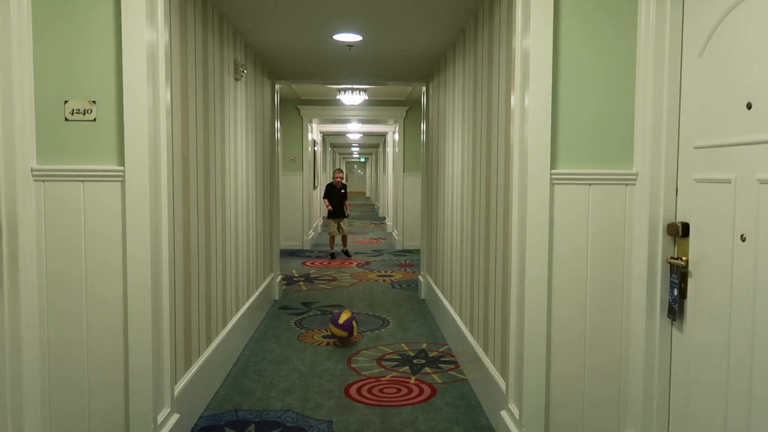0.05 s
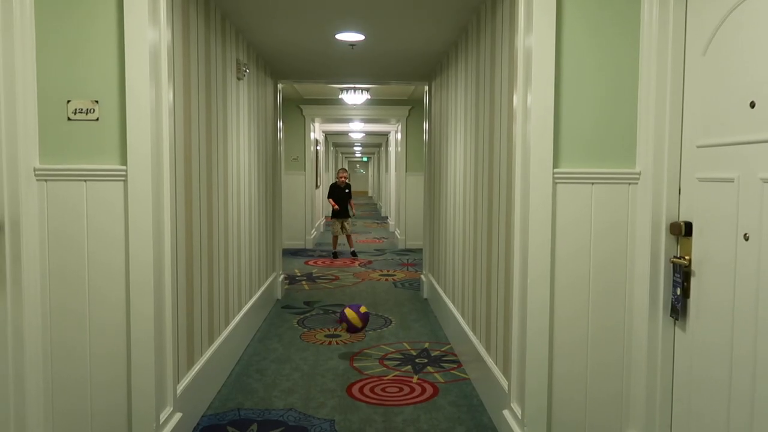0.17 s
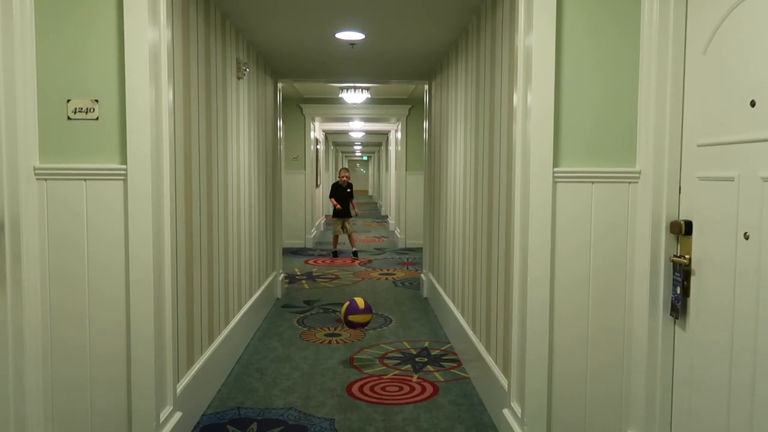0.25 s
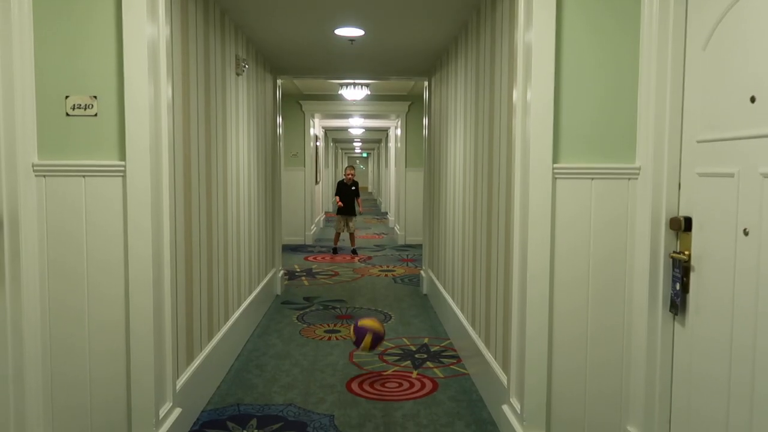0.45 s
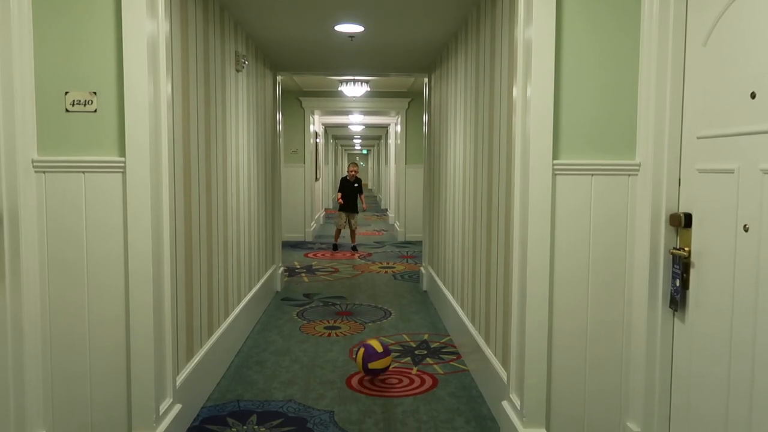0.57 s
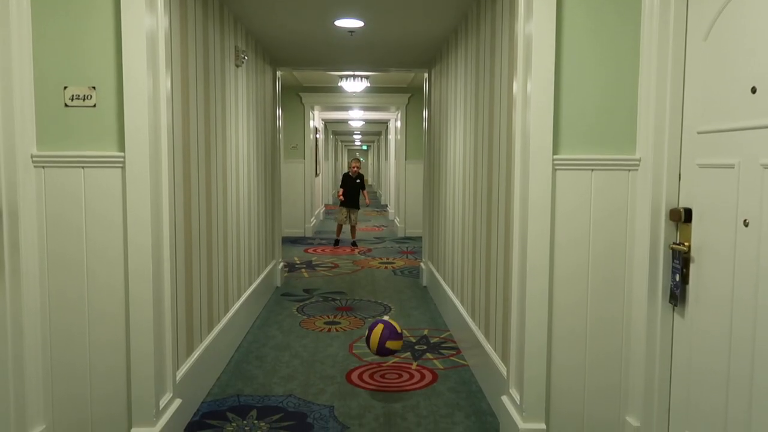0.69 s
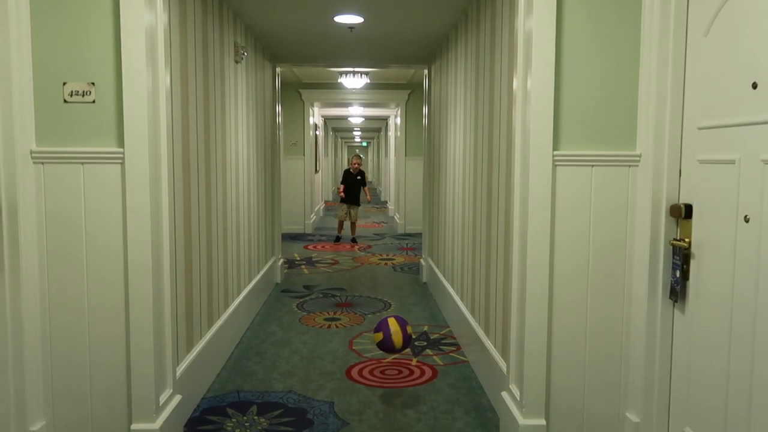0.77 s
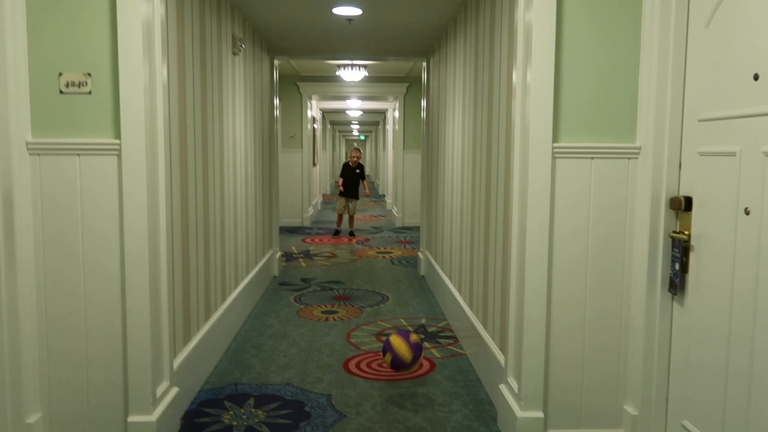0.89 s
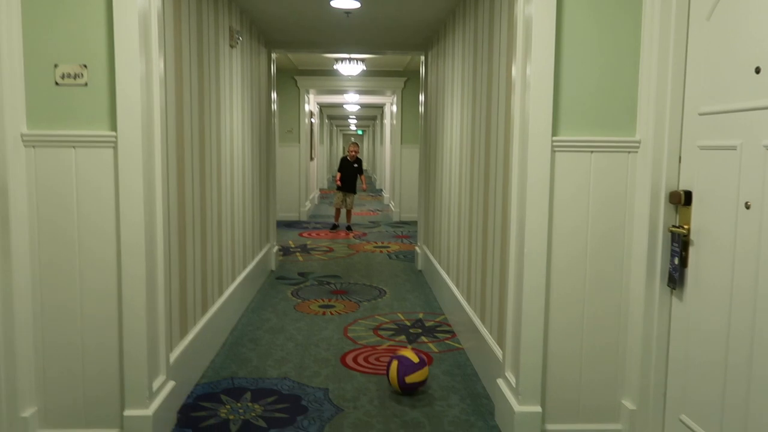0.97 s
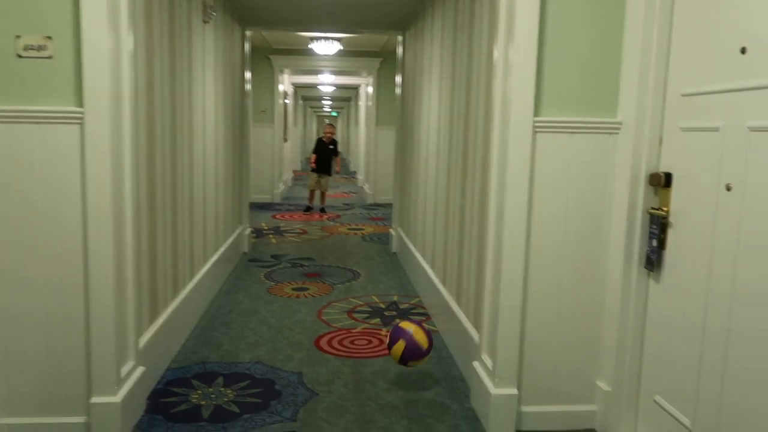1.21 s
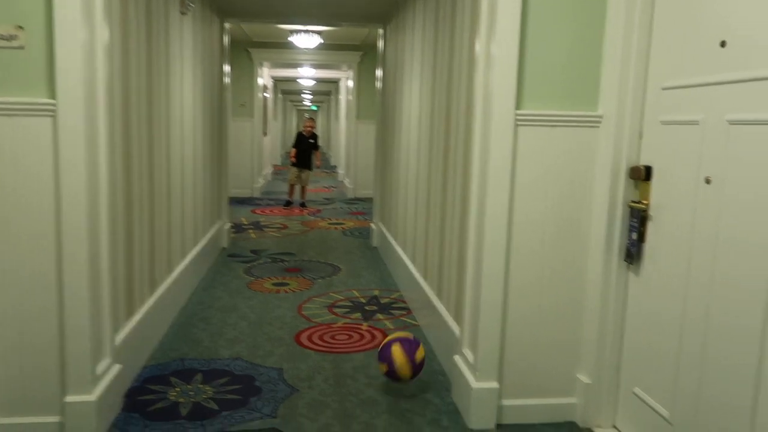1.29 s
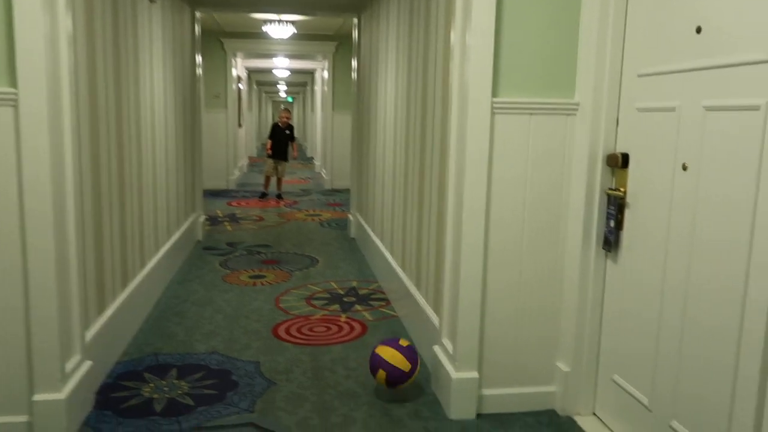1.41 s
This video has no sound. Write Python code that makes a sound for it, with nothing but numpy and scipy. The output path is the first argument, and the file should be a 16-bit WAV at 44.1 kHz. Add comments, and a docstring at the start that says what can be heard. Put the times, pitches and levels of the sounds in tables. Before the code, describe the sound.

A rubber ball bounces three times on a carpeted indoor corridor, the first with a slappy hollow ring, the next two duller and fainter, with short echoes over low ventilation rumble, heard from a fixed-distance stereo microphone.

```python
"""A faint metal ring dies away over rumbling ventilation and the fading tail of an earlier bounce.
A rubber ball then bounces three times along a carpeted corridor, each thud softer, the last two duller.
Each squash of the ball pushes the floor and the air into low modes; its slap rings the air inside the ball
and rolls away down the corridor as decaying noise bands. Faint cloth noise comes forward near the end."""
import sys
import numpy as np
from scipy import signal
from scipy.io import wavfile

SR = 44100
rng = np.random.default_rng(int(sys.argv[2]) if len(sys.argv) > 2 else 0)


def master_out(mix):
    """Clip the mix to full scale and print it as 16-bit PCM to the path in sys.argv[1]."""
    frames = np.transpose(np.atleast_2d(mix))
    ceiling = np.clip(frames, -1, 1)
    pcm = np.round(ceiling * 32767).astype(np.int16)
    wavfile.write(sys.argv[1], SR, pcm)


N = 63945


def amp(db):
    """Decibels to amplitude."""
    return 10 ** (np.asarray(db) / 20)


def rms_one(x):
    """Scale to an RMS of 1."""
    return x / np.sqrt(np.mean(x ** 2) + 1e-20)


def at_hz(points, hz):
    """Read a (f/Hz, value) table on a log frequency axis."""
    f_hz, values = np.array(points).T[:2]
    return np.interp(np.log(hz), np.log(f_hz), values)


def drift(rate_hz):
    """Random wander of RMS 1: white noise through a two-pole low-pass, run at SR / 40."""
    pole = np.exp(-2 * np.pi * rate_hz * 40 / SR)
    white = rng.standard_normal(N // 40 + 2002)
    slow = signal.lfilter([1], [1, -2 * pole, pole ** 2], white)[2000:]  # settled part
    return np.interp(np.arange(N) / 40, np.arange(len(slow)), rms_one(slow))


def ring(x, hz, t60_s):
    """Two-pole resonator: a unit click sets a decaying sine of height 1 ringing."""
    radius = amp(-60 / (t60_s * SR))
    w = 2 * np.pi * hz / SR
    return signal.lfilter([0, np.sin(w)], [1, -2 * radius * np.cos(w), radius ** 2], x + 1e-18)


def low_pass(x, hz):
    """Soft contact: a second-order low-pass."""
    return signal.sosfilt(signal.butter(2, hz, fs=SR, output="sos"), x)


def band_noise(spectrum, side, envelope):
    """Third-octave bands of stereo noise, each with its own level, width and envelope(hz)."""
    edges_hz = 22 * 2 ** np.arange(0, 9.5, 1 / 3)
    white = rng.standard_normal((2, 2, N + SR // 2))
    out, power = 0, 0
    for k, (low_hz, high_hz) in enumerate(zip(edges_hz, edges_hz[1:])):
        band = signal.butter(2, [low_hz, high_hz], "band", fs=SR, output="sos")
        mid, edge = signal.sosfilt(band, white[k % 2])[:, -N:]  # settled part
        hz = np.sqrt(low_hz * high_hz)
        gain = amp(at_hz(spectrum, hz))
        power += gain ** 2 * (high_hz - low_hz) * 2 / SR
        stereo = mid + amp(at_hz(side, hz)) * edge * [[1], [-1]]
        out = out + gain * envelope(hz) * stereo
    return out / np.sqrt(power)


# metal partials: f/Hz, level/dB, t60/s
RING = [(1252, -48, 0.13), (2910, -48.5, 0.22), (4130, -60, 0.084), (5130, -61.5, .5)]
RING_STOP_S, RING_STOP_T60_S = .054, .05   # onset and t60 of the added damping
RING_SAG_PER_S, RING_FLUTTER_DB = .3, 1.5   # fractional pitch fall per second; RMS flutter


def metal_ring():
    """A small metal part, struck just before, rings as sines, sags in pitch and is damped."""
    t = np.arange(N) / SR
    damp_db = -60 * np.maximum(t - RING_STOP_S, 0) / RING_STOP_T60_S
    damp_db = damp_db + RING_FLUTTER_DB * drift(150.0)
    bent_s = t - .5 * RING_SAG_PER_S * t ** 2
    return sum(amp(db - 60 * t / t60_s + damp_db) * np.sin(2 * np.pi * hz * bent_s)
               for hz, db, t60_s in RING)


# ventilation spectrum: f/Hz, relative level/dB per Hz
AIR = [(15, -35), (25, -3.5), (64, -0.5), (175, -9.5), (234, -13), (297, -14), (376, -18), (452, -22),
       (786, -28.5), (997, -33.5), (1780, -36.5), (3350, -41.5), (13500, -57.5)]
# stereo width, ventilation and cloth: f/Hz, side minus mid level/dB
AIR_SIDE = [(60, -43), (110, -42), (200, -19), (360, -8.5), (660, -6.5), (1200, -1), (2180, -5.5),
            (3960, 0.5), (7200, -0.5), (13100, 7.5)]
AIR_DB = -40
HUM_HZ, HUM_WIDTH_HZ, HUM_DB = 242, 12, -54


def ventilation(patchy_db=.6):
    """Steady rumble and hiss, slightly uneven by band, with a wavering hum of resonated noise."""
    hum_t60_s = np.log(1000) / np.pi / HUM_WIDTH_HZ
    hum = rms_one(ring(rng.standard_normal(N + SR), HUM_HZ, hum_t60_s)[SR:])
    air = band_noise(AIR, AIR_SIDE, lambda hz: amp(patchy_db * drift(6.3)))
    return amp(AIR_DB) * air + amp(HUM_DB) * hum


# cloth level: t/s, level/dB
RUSTLE = [(0, -66), (.1, -64), (.16, -60), (.22, -70), (1.02, -70), (1.08, -58), (1.12, -59), (1.18, -64),
          (1.25, -65), (1.3, -58), (1.34, -53), (1.37, -58), (1.4, -57), (1.43, -55)]
# cloth spectrum: f/Hz, relative level/dB per Hz
CLOTH = [(500, -17), (1000, 0.5), (1800, 8), (3000, 2), (4200, -8), (6000, -10), (10000, -20.5),
         (13500, -20)]


def rustle(grain_db=2.5):
    """Grainy cloth noise close by: one randomly flickering level for all bands."""
    level_db = np.interp(np.arange(N) / SR, *np.transpose(RUSTLE))
    level = amp(level_db + grain_db * drift(63.0))
    return band_noise(CLOTH, AIR_SIDE, lambda hz: level)


# bounces, for corridor and thuds:
# t/s, push level/dB, slap level/dB, low-pass f/Hz, echo re push/dB, tail stretch (factor)
BOUNCES = [(.2130, -16, -19.5, 3000, 2.5, 0.97), (.6848, -20, -31, 926, 7.5, 0.97),
           (1.104, -25, -35, 930, 2.5, 1.235)]
# corridor tail spectrum: f/Hz, relative level/dB per Hz
TAIL = [(100, -0.5), (200, -1.5), (350, 2.5), (500, -2), (750, 3), (1200, -3), (1500, -1), (1900, -11),
        (2400, -9.5), (3500, -13.5), (5500, -28.5), (8000, -23.5), (13000, -27)]
# corridor decay before stretch: f/Hz, t60/s
TAIL_T60 = [(100, 0.41), (300, 0.59), (700, 0.47), (1200, 0.38), (2000, 0.45), (3000, 0.19), (6000, 0.17),
            (12000, 0.1)]
# tail build-ups, the later ones returned from the corridor ends: delay/s, level re running tail/dB
FAR_ECHOES = [(0, 0.82), (0.077, -9.5), (0.136, -5.5)]
# stereo width of the tail: f/Hz, side minus mid level/dB
THUD_SIDE = [(60, -54), (110, -35), (200, -41), (360, -26), (660, -33), (1200, -14.5), (2180, -11),
             (3960, -3.5), (7200, 9), (13100, 8)]
TAIL_DB = -0.48
BUILD_S_PER_STRETCH = 0.0066   # build-up time at stretch 1; grows as stretch ** 4
EARLIER_DB, EARLIER_S = -44, 0.76   # tail of an earlier bounce: level, t60


def corridor():
    """Dense echoes of each slap build up, then die band by band; the far ends refresh them."""
    def envelope(hz):
        """Amplitude of one band over time."""
        out = 0
        for s, _, slap_db, dull_hz, _, stretch in BOUNCES:
            t = np.maximum(np.arange(N) / SR - s, 0)
            dull_db = 10 * np.log10(1 + (hz / dull_hz) ** 4)
            decay_db = 60 * t / at_hz(TAIL_T60, hz) / stretch
            build_s = BUILD_S_PER_STRETCH * stretch ** 4
            build = sum(amp(db) * (1 - np.exp(-np.maximum(t - late_s, 0) / build_s))
                        for late_s, db in FAR_ECHOES)
            out = out + amp(slap_db - dull_db - decay_db) * build
        earlier = amp(EARLIER_DB - 60 * np.arange(N) / SR / EARLIER_S) / (1 + (hz / 900) ** 2)
        return amp(TAIL_DB) * out + earlier
    return band_noise(TAIL, THUD_SIDE, envelope)


# floor and corridor modes moved by the push: f/Hz, relative level/dB, t60/s
LOW_MODES = [(89.26, -4.5, 0.48), (110.3, -2.5, 0.38), (134, -16.5, 0.12), (249.2, -2, 0.51),
             (294, 1, 0.75)]
# air inside the ball, rung by the slap: f/Hz, relative level/dB, t60/s
BALL_MODES = [(400.5, -2.5, 0.18), (530, -15, 0.28), (648, -12, 0.2), (737.5, -2, 0.21), (862, -4, 0.16),
              (930, -10, 0.17), (1216, -12.5, 0.26), (1207, -11, 0.36), (1848, -1, 0.073),
              (2385, -18, 0.39), (3000, -36, .1), (3800, -18.5, 0.15)]
CONTACT_S, SLAP_S, MODE_SPREAD_DB = .0082, .012, 2.0
ECHO_S, ECHO_DULL_HZ = 0.00928, 430   # walls and ceiling send the push back
KNOCK_DB, KNOCK_HZ, KNOCK_T60_S = -13, 740, 0.016   # first touch of skin on carpet; dB re push
CHANNEL_SHIFT_S, FLOOR_CUT_HZ = 1e-5, 46


def thuds():
    """A half-sine squash radiates its rate of change and drives low modes; a slap rings the ball."""
    out = np.zeros(N)
    spread_db = rng.normal(0, MODE_SPREAD_DB, (len(BOUNCES), len(BALL_MODES)))
    grit = rng.standard_normal(N)
    for (s, push_db, slap_db, dull_hz, echo_db, _), own_db in zip(BOUNCES, spread_db):
        t = np.arange(N) / SR - s
        squash_rate = np.cos(np.pi * t / CONTACT_S) * (t > 0) * (t < CONTACT_S)
        push = amp(push_db) * low_pass(squash_rate, dull_hz)
        echo = amp(echo_db) * low_pass(np.interp(t - ECHO_S, t, push), ECHO_DULL_HZ)

        scuff = grit * (t > 0) * (t < SLAP_S)
        scuff = scuff / np.sqrt(np.sum(scuff ** 2))  # unit energy
        slap = low_pass(amp(slap_db) * scuff, dull_hz)

        click = amp(push_db + KNOCK_DB) * (np.arange(N) == int(s * SR))
        knock = ring(click, KNOCK_HZ, KNOCK_T60_S)
        low = sum(amp(db) * ring(push, hz, t60_s) for hz, db, t60_s in LOW_MODES)
        low = low / (.5 * CONTACT_S * SR)  # half the contact, in samples
        ball = sum(amp(db + own) * ring(slap, hz, t60_s)
                   for (hz, db, t60_s), own in zip(BALL_MODES, own_db))
        out += knock + push + echo + low + ball
    out = signal.sosfilt(signal.butter(2, FLOOR_CUT_HZ, "high", fs=SR, output="sos"), out)
    # slope term: first channel slightly early, second slightly late
    return out + CHANNEL_SHIFT_S * SR * np.gradient(out) * [[1], [-1]]


def scene():
    """Sum of all layers, in stereo."""
    return metal_ring() + ventilation() + rustle() + corridor() + thuds()


STOPBAND_HZ = 13850   # 50 dB down from here up


def record(dry):
    """Steep low-pass cuts the top."""
    return signal.sosfilt(signal.cheby2(20, 50, STOPBAND_HZ, fs=SR, output="sos"), dry)


dry = scene()
out = record(dry)
master_out(out)
```